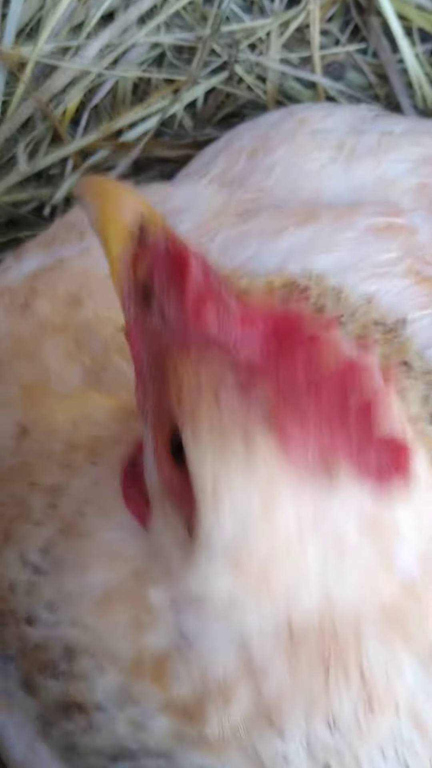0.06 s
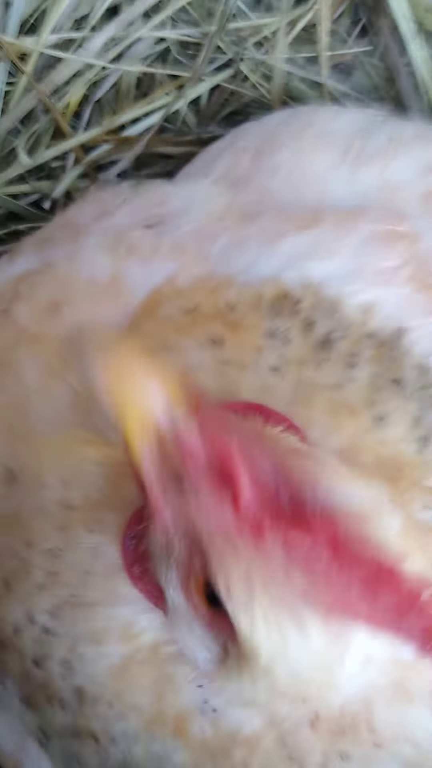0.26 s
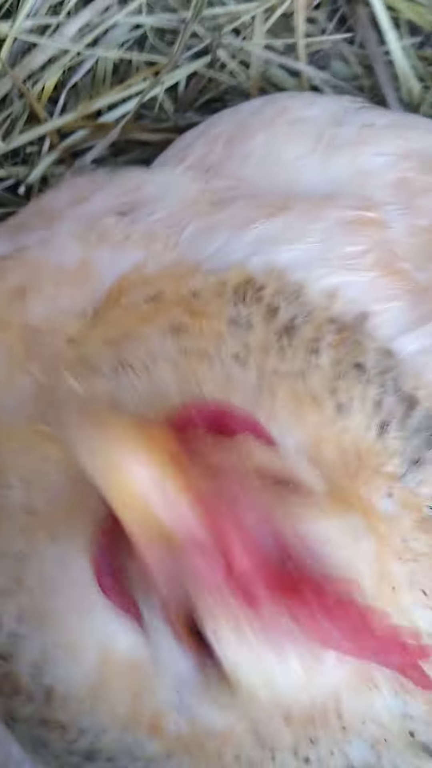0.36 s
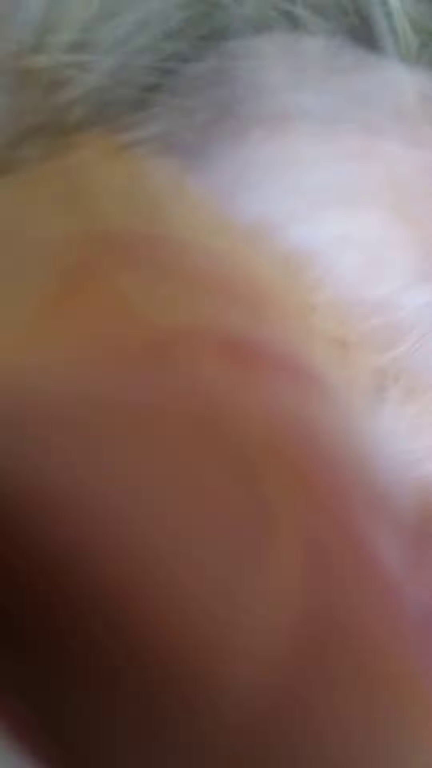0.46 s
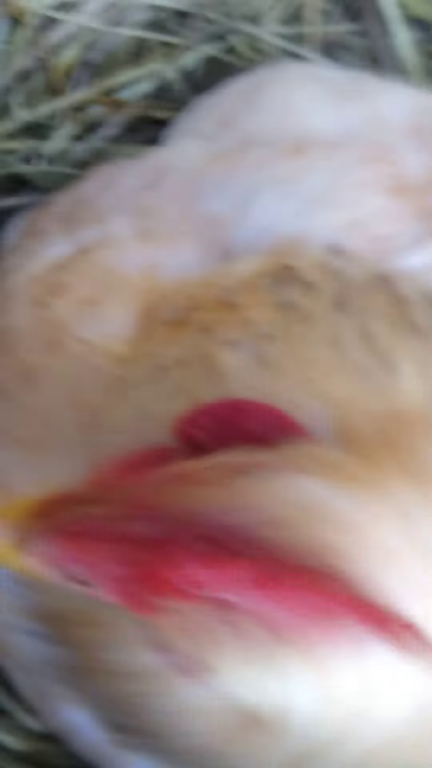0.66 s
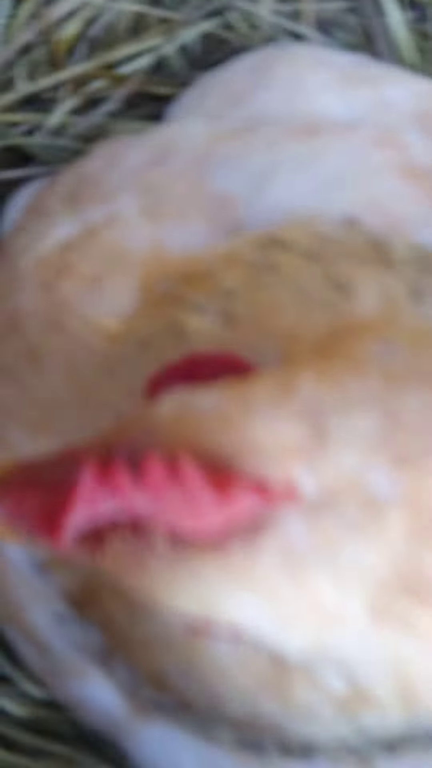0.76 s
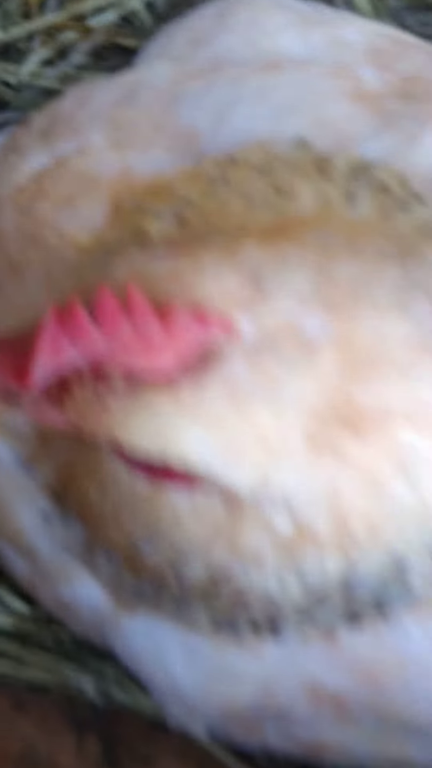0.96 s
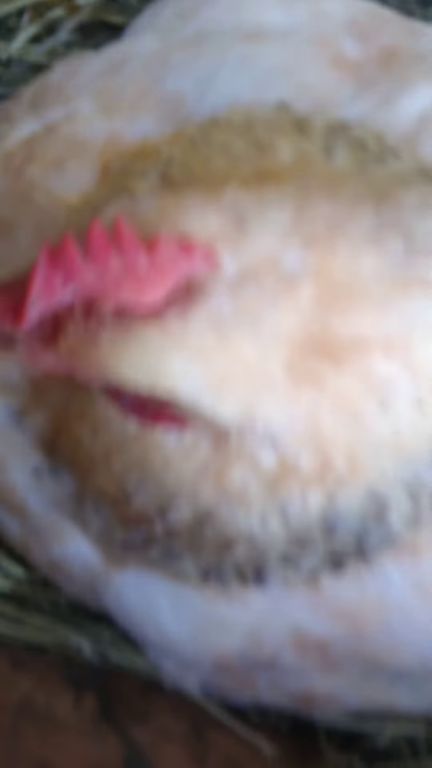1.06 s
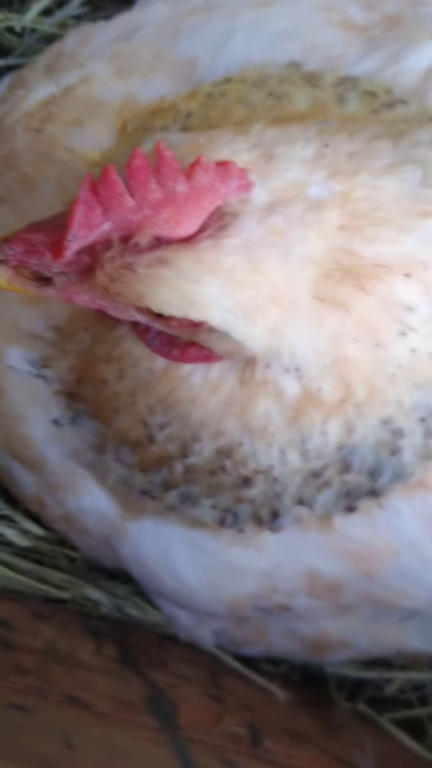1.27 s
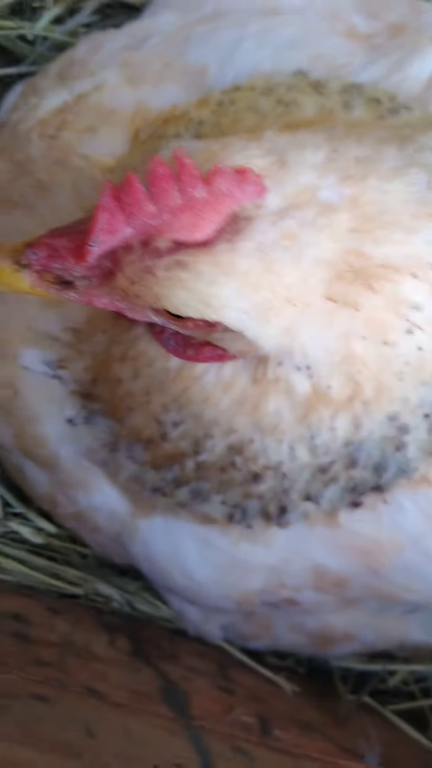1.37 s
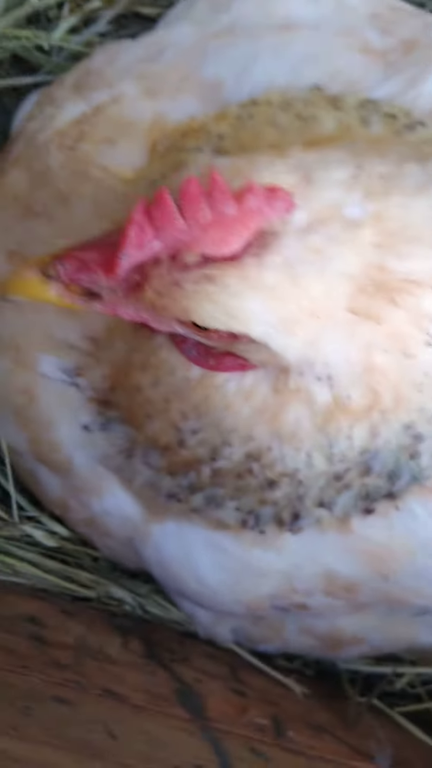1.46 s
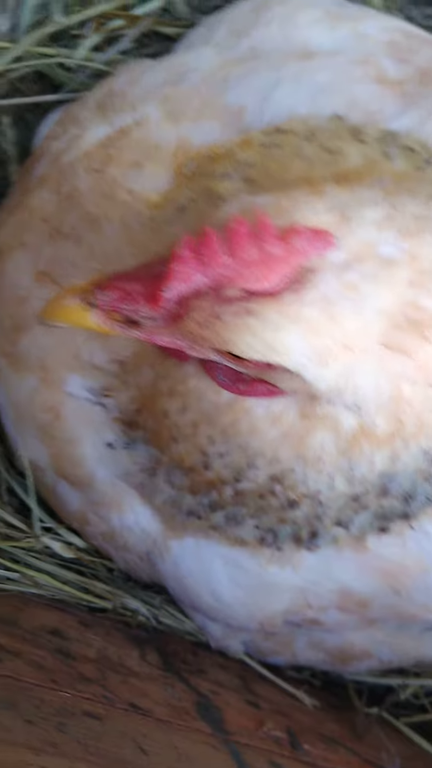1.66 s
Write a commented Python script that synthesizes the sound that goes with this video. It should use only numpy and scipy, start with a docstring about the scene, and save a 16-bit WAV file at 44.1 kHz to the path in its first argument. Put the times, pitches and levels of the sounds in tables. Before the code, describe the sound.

One raspy hen call close up, followed by a loud peck on the microphone.

```python
"""Over a faint rumble, a hen on her nest gives one harsh call, and straw ticks under it.
The call rattles because her voice flips quickly between a high and a low pitch.
A hiss comes in, and she pecks the microphone, overloading it and rattling its casing.
A low hum swells and dies while the hiss fades and soft bumps sound.
Last, small birds chirp faintly outside the coop, among a few more ticks of straw."""
import sys
import numpy as np
from scipy import signal
from scipy.io import wavfile
from scipy.ndimage import uniform_filter1d

SR = 44100
rng = np.random.default_rng(int(sys.argv[2]) if len(sys.argv) > 2 else 0)


def store_wav(level_fs):
    """Save 16-bit WAV to argv[1]."""
    pcm = np.round(np.clip(np.atleast_2d(level_fs), -1, 1) * 32767)
    wavfile.write(sys.argv[1], SR, pcm.T.astype(np.int16))


N = 74970

# Levels in dB are relative. A TONE table says how strong the low and high parts of a sound are.
# Each row of a TONE table: frequency in Hz, level in dB.
RUMBLE_TONE = [(20, -11), (65, -4.5), (110, 4), (170, -11), (280, -25.5), (600, -33.5), (2500, -35.5),
               (6000, -40.5), (16000, -44.5)]
THROAT_TONE = [(60, -35.5), (140, -16.5), (230, -5), (320, -4.5), (430, 0.5), (485, -0.5), (540, 1),
               (650, -1), (770, -3.5), (900, -6), (1100, -7.5), (1400, -13.5), (1510, -17.5), (1680, -8),
               (1880, -15.5), (2130, -32.5), (2700, -40.5), (3600, -46), (7000, -59.5)]
CHEST_TONE = [(30, -21.5), (90, -14), (150, -4), (260, 8), (330, -10), (500, -36.5)]
NEST_ECHO_TONE = [(400, -11.5), (1200, -1)]
RASP_TONE = [(300, -21), (1200, -1.5), (2500, 1.5), (4000, -17), (4700, -9), (5600, -14.5), (6800, -12.5),
             (10500, -12.5), (12500, -25), (16000, -57)]
STRAW_TONE = [(300, -11), (2500, 4.5), (6000, -11.5), (12000, -7), (16000, -7)]
HISS_TONE = [(100, 7), (190, 5.5), (270, 13.5), (350, 0), (550, 3.5), (1300, -3.5), (4000, -5),
             (8000, -4.5), (12000, -1.5), (16000, -6.5)]
BEAK_TONE = [(40, -18.5), (150, -8), (450, 11), (900, -0.5), (2200, -0.5), (4000, -14.5), (9000, -12.5),
             (16000, -20)]
RATTLE_TONE = [(500, -29.5), (4000, -15), (8000, -5.5), (12000, 6.5), (16000, -8)]
BUMP_TONE = [(100, -4.5), (1100, 2.5), (1500, -38), (4000, -17)]
BUZZ_TONE = [(4800, -52), (5900, 0), (7500, 1), (8300, -50)]

# The hen's call. Each row: time in seconds, high pitch in Hz, share of each flutter spent low.
CALL_PITCH = [(.16, 426.1, .9), (.205, 428.8, 0.89), (.222, 446.3, 0.17), (.245, 435.8, 0.46),
              (.262, 436.7, 0.082), (.30, 466.6, 0.15), (.32, 457.8, 0.24), (.338, 475.7, 0.62),
              (.362, 477.2, 0.26), (.40, 474.6, .25), (.44, 467.2, 0.26), (.465, 442.9, .5),
              (.495, 437.7, 0.64), (.53, 424.4, 0.74)]
# The second side of her voice box. Each number: strength at 1, 2, 3 and 4 times the high pitch.
STEADY_HARMONICS = [.35, 1, 1.1, .7]
# How loud the voice, its rasp and the hiss are. Each row: time in seconds, level in dB.
CALL_EFFORT = [(.16, -68.5), (.175, -49), (.182, -36), (.19, -45), (.196, -24), (.212, -31), (.236, -29.5),
               (.29, -28.5), (.35, -25.5), (.435, -25.5), (.46, -24), (.495, -22), (.531, -26.5),
               (.537, -39), (.56, -64.5)]
RASP_LEVEL = [(0.185, -106), (0.193, -65), (0.233, -55), (0.235, -55), (0.315, -46.5), (0.419, -60),
              (0.479, -51), (0.55, -65.5)]
HISS_LEVEL = [(.5, -120), (.55, -46), (.6, -47.5), (.655, -36), (.71, -45.5), (.86, -53), (.97, -61),
              (1.15, -69), (1.3, -105)]
# Which side the call leans to. Each row: frequency in Hz, left minus right in dB.
CALL_BALANCE = [(200, 4.5), (700, 4.5), (900, -1), (1170, -7), (1400, -2.5), (1850, 1), (2500, 6.5),
                (4400, -1.5), (15000, -4)]
# Small knocks. Each row: start in seconds, level in dB.
STRAW_TICKS = [(0.2265, -25), (.604, -47), (1.396, -57.5), (1.507, -66.5)]
CASING_RATTLES = [(0.6247, -21), (0.625, -18.5), (0.6295, -1.5), (.631, -9.5), (0.6387, -12.5),
                  (0.6457, -11.5), (0.6551, -23.5)]
SOFT_BUMPS = [(0.782, -47.5), (0.839, -56), (1.0218, -52), (1.04, -51), (1.054, -41)]
# The beak's hits. Each row: start in seconds, left level in dB, right level in dB, decay in seconds.
BEAK_HITS = [(0.6138, 9, -9.5, 0.0022), (0.6166, -1, -15, 0.001), (0.628, -14, -0.5, 0.00063)]
# Notes that ring after a knock. Each row: frequency in Hz, level in dB, seconds to fade by 60 dB.
CASING_NOTES = [(66.6, -18.5, 0.033), (104.7, -7, 0.1), (190, -5, .035), (257, -33, .2), (450, -7, .035),
                (570, -11, 0.023)]
BUMP_NOTES = [(243.5, 10, 0.034), (535, 4.5, 0.013), (543, -16.5, 0.23), (798, -7.5, 0.034),
              (1086, -27, 0.0071)]
# Chirps. Each row: start in seconds, length in seconds, first pitch in Hz, last pitch in Hz, level in dB.
BIRD_CHIRPS = [(1.071, 0.073, 2457, 3800, -64.5), (1.144, 0.044, 3648, 2850, -64.5),
               (1.19, .09, 3900, 3080, -69), (1.616, 0.079, 5000, 4154, -84)]


def amp(db):
    """Turns decibels into a number to multiply by."""
    return 10 ** (np.asarray(db) / 20)


def unit(x):
    """Scales a signal to an average power of 1."""
    return x / np.sqrt(np.mean(x ** 2) + 1e-20)


def clock():
    """The time of every sample, in seconds."""
    return np.arange(N) / SR


def curve(rows, column=1):
    """One column of a time table, joined by straight lines."""
    rows = np.array(rows)
    return np.interp(clock(), rows[:, 0], rows[:, column])


def colour(x, tone, share=1):
    """Filters a sound by a tone table; share scales the table's dB values."""
    size = 8192
    hz, db = np.transpose(tone)
    log_hz = np.log(abs(np.fft.fftfreq(size, 1 / SR)) + 1)
    log_gain = np.log(amp(share * np.interp(log_hz, np.log(hz), db)))
    response = np.exp(np.conj(signal.hilbert(log_gain)))  # rings after a sound, never before it
    taps = np.fft.ifft(response).real[:size // 2]
    return signal.fftconvolve(x, taps)[:len(x)]


def noise(tone):
    """Steady noise shaped by a tone table."""
    return unit(colour(rng.standard_normal(N), tone))


def stereo_noise(tone):
    """Separate noise for left and right."""
    return np.array([noise(tone), noise(tone)])


def wander(samples):
    """A smooth random drift; more samples make it slower."""
    return unit(uniform_filter1d(uniform_filter1d(rng.standard_normal(N), samples), samples))


def burst(start, decay_s):
    """A sudden start, then a smooth fade."""
    age = clock() - start
    return (age >= 0) * np.exp(-abs(age) / decay_s)


def ring(start, notes):
    """Pure notes that start together and fade."""
    age = np.maximum(clock() - start, 0)
    return sum(amp(db) * np.exp(-np.log(1000) * age / fade_s) * np.sin(2 * np.pi * hz * age)
               for hz, db, fade_s in notes)


def place(x, right_db):
    """Makes a stereo pair with the right side turned down."""
    return np.array([x, x * amp(right_db)])


def echo(x, fade_s):
    """A wash of reflections, different on each side, that falls 60 dB in fade_s."""
    tail = rng.standard_normal((2, SR)) * np.exp(-np.log(1000) * clock()[:SR] / fade_s)
    return signal.fftconvolve(x[None], tail / np.linalg.norm(tail[0]), axes=1)[:, :N]


def rumble():
    """Faint, low background noise, partly shared by both sides."""
    sides = amp(-68.5) * stereo_noise(RUMBLE_TONE)
    return sides + .35 * sides[::-1]


def voice_box(low_hz=320, flutter_hz=58.42, slowing_hz_per_s=14, jitter=.02):
    """One side flips between two pitches, the other stays high. Returns the sound and its air puffs."""
    slowing = slowing_hz_per_s * (clock() - CALL_PITCH[0][0])
    flutters = np.cumsum(flutter_hz * (1 + .16 * wander(400)) - slowing) / SR
    zigzag = abs(2 * (flutters % 1) - 1)
    low = .5 + .5 * np.tanh((curve(CALL_PITCH, column=2) - zigzag) / .19)  # near 1 on the low pitch
    hz = (curve(CALL_PITCH) * (1 - low) + low_hz * low) * (1 + jitter * wander(90))
    cycles = np.cumsum(hz) / SR
    pulses = unit(sum(np.cos(2 * np.pi * k * cycles) for k in range(1, 18)))
    pulses *= 1 + .18 * wander(60)
    puffs = unit(.25 + np.exp(-(cycles % 1) / .3))
    flipping = (pulses + .1 * puffs * rng.standard_normal(N)) * amp(1.5 * low)
    steady_cycles = np.cumsum(curve(CALL_PITCH) * (1 + jitter / 2 * wander(90))) / SR
    steady = sum(gain * np.cos(2 * np.pi * k * steady_cycles) for k, gain in enumerate(STEADY_HARMONICS, 1))
    return flipping + amp(-7) * steady / 2, puffs


def hen_call(bright_above_hz=1400, right_delay_s=.00018):
    """The throat shapes the voice, each puff of air adds rasp, and the nest and coop echo."""
    t = clock()
    source, puffs = voice_box()
    voice = unit(colour(source, THROAT_TONE))
    voice /= np.sqrt(abs(uniform_filter1d(voice ** 2, size=1200)) + 1e-6)  # evens out the loudness
    effort_db = curve(CALL_EFFORT)
    treble = signal.sosfiltfilt(signal.butter(4, bright_above_hz, "high", fs=SR, output="sos"), voice)
    voice += treble * (amp(.3 * (effort_db + 27)) - 1)  # more effort sounds brighter
    voice += amp(-17.5) * noise(CHEST_TONE)
    calling = uniform_filter1d(1. * (t > CALL_EFFORT[0][0]) * (t < CALL_EFFORT[-1][0]), size=200)
    voice *= amp(effort_db - 1.5) * calling
    sides = np.array([voice, np.interp(t - right_delay_s, t, voice)])
    sides += amp(-8) * echo(colour(voice, NEST_ECHO_TONE), fade_s=.028)
    sides += stereo_noise(RASP_TONE) * puffs * amp(curve(RASP_LEVEL) + 6) * calling
    near = np.array([colour(sides[0], CALL_BALANCE, .5), colour(sides[1], CALL_BALANCE, -.5)])
    coop = amp(-28) * echo(voice, fade_s=.21)
    return near + coop


def straw():
    """Dry straw ticks, each a tiny burst of noise."""
    ticks = sum(amp(db) * burst(start, decay_s=.00033) for start, db in STRAW_TICKS)
    return ticks * stereo_noise(STRAW_TONE)


def hiss():
    """A hiss, perhaps feathers brushing past, rises before the peck and fades after it."""
    return place(amp(curve(HISS_LEVEL) - 4), right_db=-3) * stereo_noise(HISS_TONE)


def peck(push_at_s=.611, push_width_s=.0006, skid_s=.002):
    """Air pushes on the microphone, the beak skids and hits, and the casing rings and rattles."""
    first_hit = BEAK_HITS[0][0]
    push = -amp(-6.5) * np.exp(-((clock() - push_at_s) / push_width_s) ** 2)
    thud = place(push + ring(first_hit, CASING_NOTES), right_db=-21.5)
    time_to_hit = first_hit - clock()
    skid = amp(-18.5) * (time_to_hit > 0) * np.exp(-abs(time_to_hit) / skid_s)
    hits = sum(amp([[left_db], [right_db]]) * burst(start, decay_s)
               for start, left_db, right_db, decay_s in BEAK_HITS)
    crack = (skid + hits) * stereo_noise(BEAK_TONE)
    clicks = sum(amp(db) * burst(start, decay_s=.00065) for start, db in CASING_RATTLES)
    rattle = place(clicks * noise(RATTLE_TONE), right_db=-17)
    return thud + crack + rattle


def hum(start=.682, hz=100, rise_s=.52, fade_s=.51):
    """The peck leaves a low hum that swells and dies on the left."""
    swell = 1 - np.exp(-np.maximum(clock() - start, 0) / rise_s)
    return place(swell * ring(start, [(hz, -4, fade_s)]), right_db=-71)


def bumps():
    """Dull little bumps in the nest, each ringing briefly."""
    knocks = sum(amp(db) * ring(start, BUMP_NOTES) for start, db in SOFT_BUMPS)
    return place(colour(knocks, BUMP_TONE), right_db=-9.5)


def birds(waver=.035):
    """Distant birds whistle sliding notes, heard mostly as echo from the yard."""
    song = np.zeros(N)
    for start, length, first_hz, last_hz, db in BIRD_CHIRPS:
        progress = np.clip((clock() - start) / length, 0, 1)
        hz = (first_hz + (last_hz - first_hz) * progress) * (1 + waver * wander(40))
        swell = np.sqrt(abs(np.sin(np.pi * progress)))
        song += amp(db) * swell * np.sin(2 * np.pi * np.cumsum(hz) / SR)
    return amp(-3) * song + echo(song, fade_s=.75)


def bird_buzz():
    """One thin, high, buzzing note made of fading noise."""
    return amp(-66.5) * burst(start=1.255, decay_s=.084) * stereo_noise(BUZZ_TONE)


def scene():
    """Adds all the sounds together in stereo."""
    return rumble() + hen_call() + straw() + hiss() + peck() + hum() + bumps() + birds() + bird_buzz()


def record(dry):
    """The microphone overloads on the peck, and the highest treble is cut away."""
    limit, cutoff_hz = .92, 16200
    clipped = np.clip(dry, -limit, limit)
    low_pass = signal.firwin(255, cutoff_hz, window=("kaiser", 8), fs=SR)
    return signal.oaconvolve(clipped, low_pass[None], "same")


dry = scene()
out = record(dry)
store_wav(out)
```